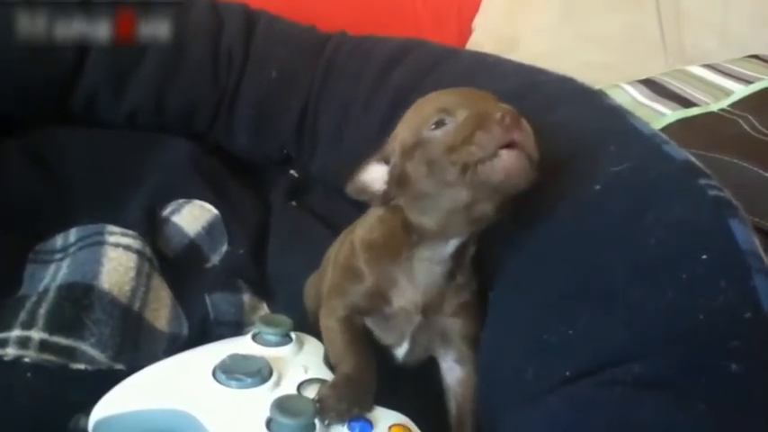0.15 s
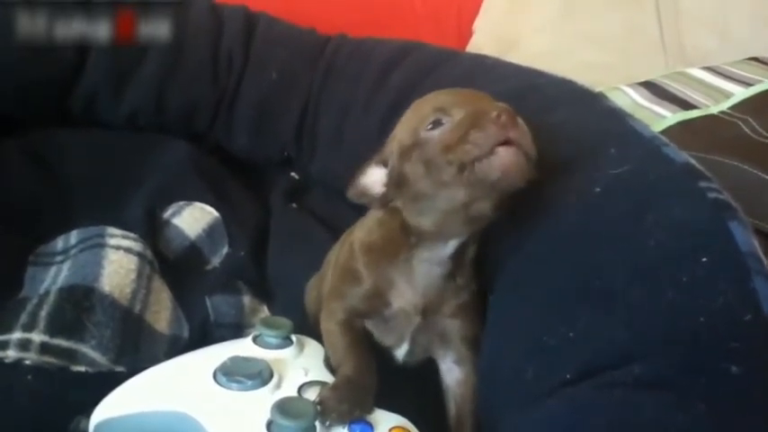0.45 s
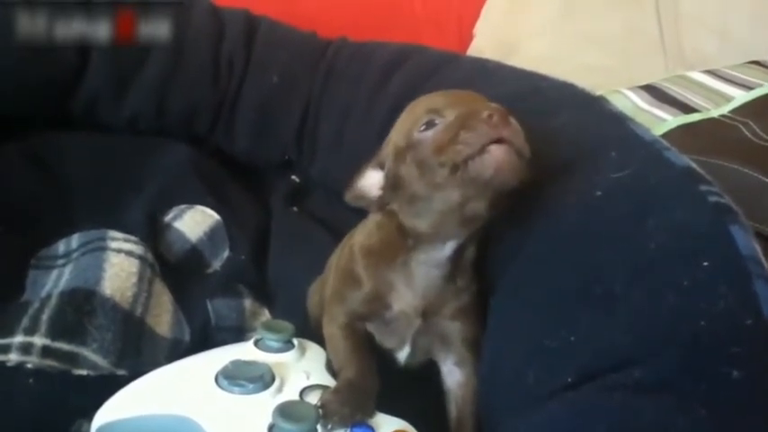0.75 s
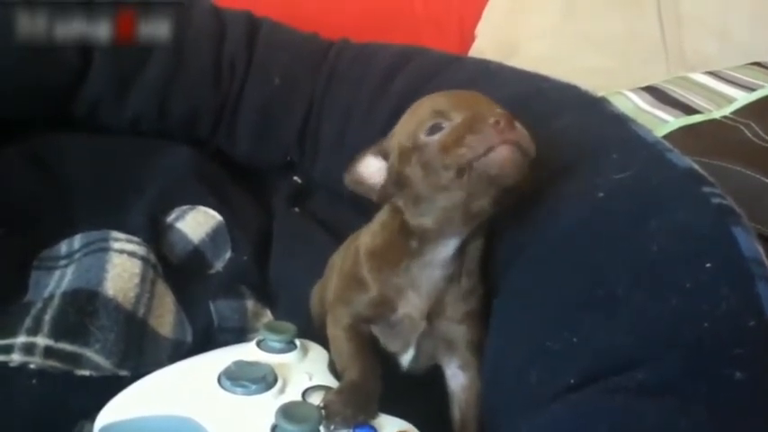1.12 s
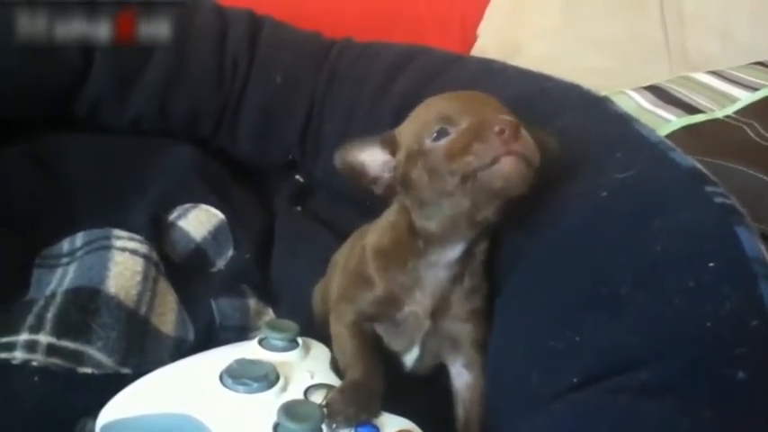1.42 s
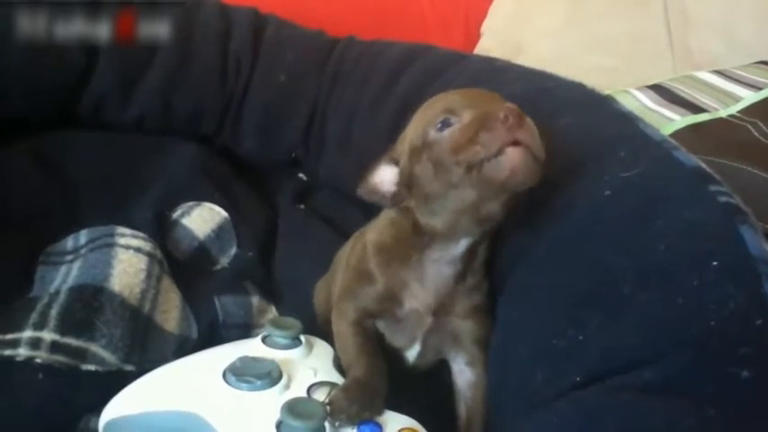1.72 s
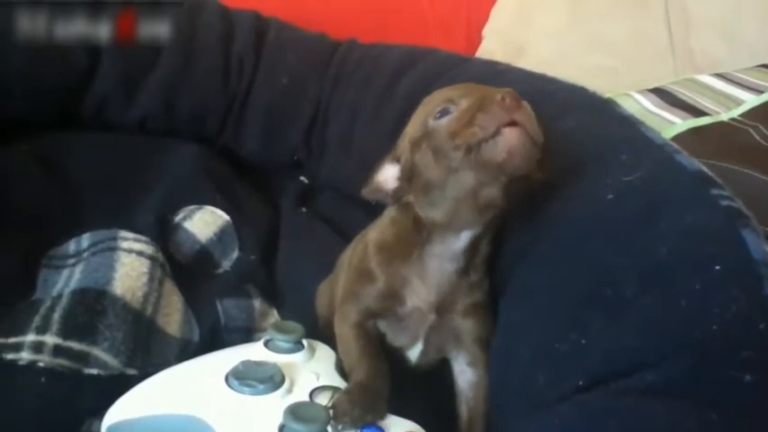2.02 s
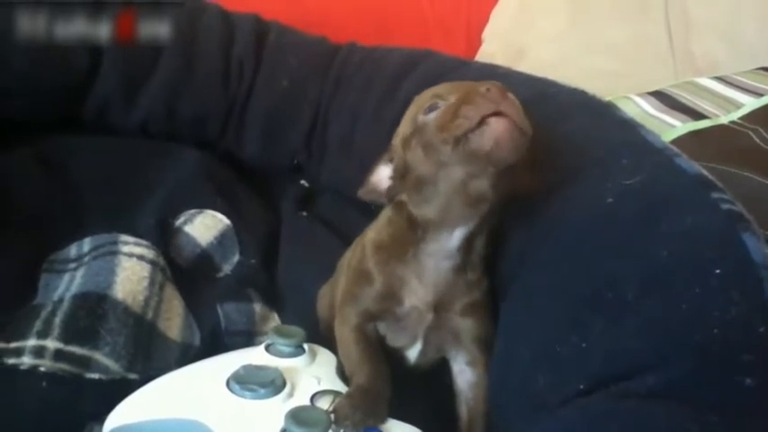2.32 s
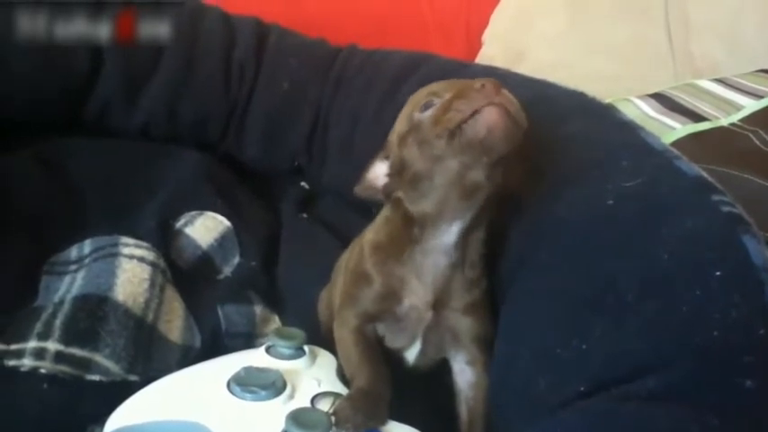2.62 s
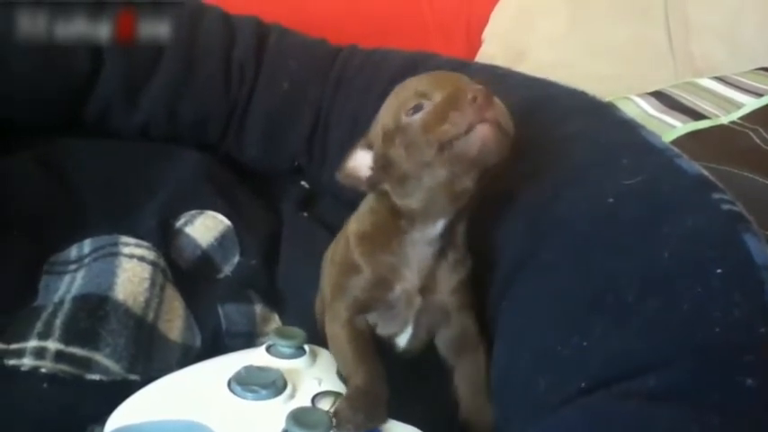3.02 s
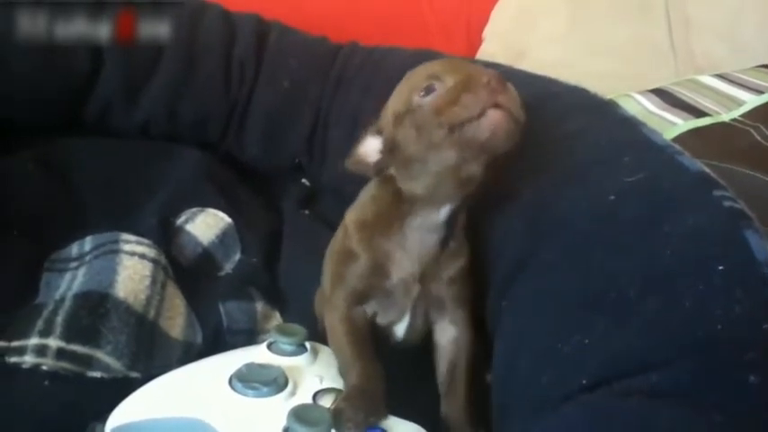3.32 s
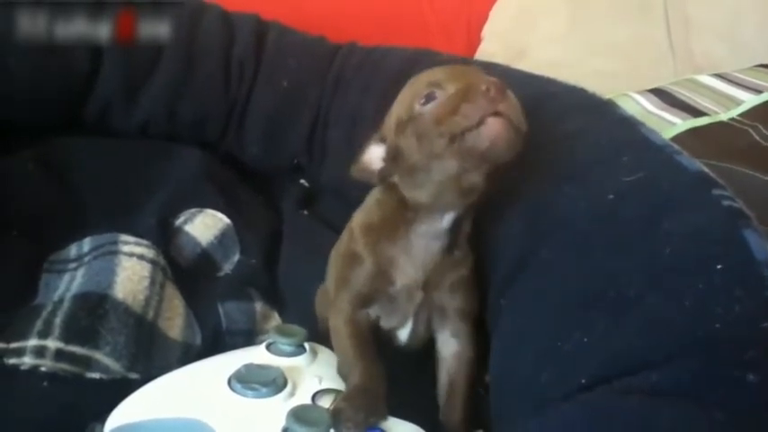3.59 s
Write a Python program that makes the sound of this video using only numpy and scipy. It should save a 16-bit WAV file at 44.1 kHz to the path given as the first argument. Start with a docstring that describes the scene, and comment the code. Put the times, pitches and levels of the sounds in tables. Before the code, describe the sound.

A young puppy howls three times, close to the microphone in a quiet, soft room; each howl slides up fast, and the last, after a soft breath, is cut off. Faint hum and hiss lie beneath.

```python
"""A clean, high puppy howl slides up at once, close by in a quiet, soft room; two more follow.
Each howl stacks partials on one gliding pitch, with pulsed air leaking through.
Short creaks roughen the starts of the howls and the ends of the first two: uneven pulses ring a throat.
Under them lie a wavering mains hum and a coloured noise floor of room hum and microphone hiss.
Shaped noise makes a soft breath before the last howl and a low rustle that swells near the end."""
import sys
import numpy as np
from scipy import signal
from scipy.fft import rfft, irfft
from scipy.io import wavfile
from scipy.ndimage import uniform_filter1d

SR = 44100
rng = np.random.default_rng(int(sys.argv[2]) if len(sys.argv) > 2 else 0)


def wav_record(signal):
    """Record a signal, one row per channel, as 16-bit PCM in the file named by sys.argv[1]."""
    frames = np.transpose(np.atleast_2d(signal))
    bounded = np.clip(frames, -1, 1)
    # unit amplitude maps onto the largest positive 16-bit level
    quanta = np.round(bounded * 32767).astype(np.int16)
    wavfile.write(sys.argv[1], SR, quanta)


N = 165375

# Noise floor of room and microphone, relative colour: f/Hz, density/dB per Hz
FLOOR_COLOUR = [(25, -25.5), (125, -0.5), (214, -5.5), (258, -2.5), (441, -12), (478, -6), (561, -12),
                (1160, -13), (1730, -15), (2390, -20), (3480, -22), (15200, -28)]
FLOOR_DB = -44.5
HUM_HZ, HUM_DB = 124.3, -56

# Low rustle that swells near the end: t/s, level/dB
RUSTLE_LEVEL = [(3.45, -50), (3.512, -65), (3.75, -37.5)]
# Colour of the rustle: f/Hz, relative level/dB
RUSTLE_COLOUR = [(40, -42), (120, -16), (250, -22), (450, -44), (900, -48)]

# Breath drawn before the last howl: t/s, level/dB
INHALE_LEVEL = [(2.98, -62), (3.004, -43), (3.25, -52), (3.27, -55)]
# Colour of that breath: f/Hz, relative level/dB
INHALE_COLOUR = [(300, -2), (1000, 2), (2000, -2), (3000, -8.5), (6000, -17), (9000, -32)]

ROOM_DB, ROOM_T60_S, ROOM_TOP_HZ = -26.5, 0.35, 1250

# Moments where the folds lose their beat:
# start t/s, length/s, level/dB, mean pulse rate/Hz, unevenness/0-1, level change over the creak/dB
CREAKS = [(0.006, 0.076, -30, 360, .3, -4), (0.957, 0.062, -25, 430, .3, -16),
          (1.744, 0.034, -27.5, 420, .3, 8), (2.625, 0.03, -30, 430, .3, -14),
          (3.2895, 0.03, -25.5, 265, .1, -2)]
CREAK_RISE_S, CREAK_FADE = 0.0022, 0.36  # the last share of each creak dies away
# Throat resonances rung by each creak pulse: f/Hz, width/Hz, relative level/dB
THROAT_RINGS = [(520, 300, -5), (822, 100, 13), (1220, 400, 1), (1890, 570, -11), (2234, 180, -10)]

# Pitch and partials through each of the three howls:
# t/s, pitch f/Hz, first partial level/dB, second level/dB, third level/dB, fourth level/dB
HOWLS = [
    [(0.0, 529.5, -20, -26.5, -40, -36.5), (0.036, 651, -20.5, -19, -26, -44),
     (0.056, 798, -18.5, -24, -36.5, -53), (0.076, 835, -15.5, -20.5, -32.5, -34),
     (0.096, 890, -12, -18, -40, -37), (0.14, 987, -14.5, -19, -36.5, -53),
     (0.17, 1011, -8.5, -19.5, -35, -42), (0.192, 1026, -14.5, -19.5, -36, -39.5),
     (0.322, 1061, -10, -17.5, -38, -39.5), (0.388, 1051, -13, -18, -40.5, -38.5),
     (0.496, 1015, -13, -18.5, -37, -43.5), (0.568, 1002, -8, -17, -41.5, -48),
     (0.576, 995, -11, -18, -38.5, -52), (0.642, 945, -17.5, -19.5, -42, -29.5),
     (0.72, 916.5, -12, -18.5, -39, -34), (0.778, 881.7, -14.5, -18, -38.5, -44),
     (0.86, 868.3, -14.5, -18, -37.5, -40), (0.955, 740, -23, -19, -32.5, -46),
     (0.961, 743, -39, -31, -47, -57)],
    [(1.639, 291, -32, -40.5, -52.5, -52), (1.664, 361.6, -24.5, -39, -32, -45),
     (1.688, 426.6, -21.5, -28.5, -30.5, -41.5), (1.73, 494.3, -20.5, -26.5, -43, -35),
     (1.75, 615, -24, -18.5, -24.5, -37), (1.758, 714, -19, -23, -32, -56),
     (1.766, 829, -20, -20.5, -40.5, -41), (1.78, 903, -10, -20, -37, -51),
     (1.796, 907, -15, -22, -41, -55), (1.826, 969, -11, -20.5, -36, -44),
     (1.89, 1071, -9.5, -19, -31.5, -34.5), (1.924, 1098, -7.5, -19.5, -32, -43),
     (2.07, 1082, -8.5, -19, -33.5, -46.5), (2.136, 1074, -9, -17.5, -34, -39.5),
     (2.274, 1032, -15, -18, -37, -39), (2.438, 994, -11, -18, -41, -43),
     (2.458, 962, -18.5, -19.5, -41.5, -43.5), (2.504, 914, -14.5, -18, -41, -31.5),
     (2.546, 845, -18.5, -17.5, -40, -43), (2.59, 726, -26.5, -17.5, -31, -42.5),
     (2.62, 683, -31, -25, -39, -50), (2.63, 686, -45, -34, -48, -57)],
    [(3.29, 738, -27.5, -45, -42, -52), (3.311, 846, -17.5, -26.5, -43, -59),
     (3.321, 882, -13.5, -21, -41, -63), (3.341, 998, -11.5, -25, -35, -40),
     (3.359, 1075, -11.5, -25.5, -32, -35.5), (3.385, 962, -11, -24, -38, -42),
     (3.399, 932, -16, -19, -32.5, -45), (3.439, 973.5, -11, -21, -37.5, -41),
     (3.469, 1009, -9.5, -20.5, -32, -36.5), (3.511, 1003, -8, -19, -35.5, -37),
     (3.563, 1028, -13, -19, -40, -39), (3.595, 1038, -11.5, -21, -33.5, -36.5),
     (3.647, 1060, -13, -20, -40, -35), (3.741, 1015, -12.5, -20, -38, -40),
     (3.75, 996, -10.5, -21, -60, -38)],
]
# Treble level through each howl, before throat colour and glide: t/s, level/dB
HOWL_TREBLE = [
    [(0.0, -69), (0.004, -51), (0.312, -37), (0.66, -44.5), (0.872, -41.5), (0.958, -49)],
    [(1.7, -58), (1.826, -39.5), (1.99, -38.5), (2.568, -45.5), (2.63, -55)],
    [(3.295, -52), (3.36, -42), (3.685, -40), (3.75, -44)],
]
# Throat and mouth colour of the air and the partials above the fourth: f/Hz, relative level/dB
TRACT_COLOUR = [(900, -6.5), (1500, 0.5), (2200, -2), (2700, -13.5), (3500, -5), (4150, -5), (4600, -11.5),
                (5200, -16), (6000, -29), (7200, -12), (8300, -6), (9600, -9.5), (10700, -15.5),
                (12300, -15), (13500, -27), (14300, -52.5)]
# Uneven beats, one strong cycle per group: start t/s, length/s, cycles per group, depth/0-1
WOBBLES = [(.008, .036, 2, .3), (.052, .026, 3, .4), (1.758, .02, 2, .5), (2.606, .018, 2, .25),
           (3.284, .044, 3, .65)]

EDGE_S, FAST_GLIDE_HZ_PER_S = 0.00058, 1800
JITTER, GLIDE_JITTER = 0.0019, 0.006  # share of the pitch: always, and added in fast glides
FLUTTER_DB, WAVER_DB, SHIMMER_DB = 0.7, 0.45, 3  # waver is per partial number
CHEST_DB_PER_PARTIAL, CHEST_TOP_HZ = -5, 3200  # partials above the fourth that follow its level
BREATHY_DB, TREBLE_AIR_DB, GLIDE_AIR_DB = -38, -18, 13
TREBLE_HZ = 6500  # treble air is cut by 40 dB below this
BAND_TOP_HZ = 15330


def gain_of(db):
    """Turn decibels into an amplitude factor."""
    return 10 ** (np.asarray(db) / 20)


def evened(x):
    """Scale a signal to rms 1."""
    return x / np.sqrt(np.mean(x ** 2) + 1e-20)


def read(points, hz):
    """Read a colour curve on a logarithmic frequency scale."""
    f, value = np.transpose(points)
    return np.interp(np.log(hz + 1), np.log(f + 1), value)


def add(mix, start_s, sound):
    """Lay a sound into the mix, cut off at the end of the scene."""
    part = mix[max(round(start_s * SR), 0):][:len(sound)]
    part += sound[:len(part)]


def coloured(points, size):
    """Noise of rms 1, its spectrum shaped by a colour curve."""
    spectrum = rfft(rng.standard_normal(size))
    hz = np.fft.rfftfreq(size, 1 / SR)
    return evened(irfft(spectrum * gain_of(read(points, hz)), size))


def drift(size, span_s):
    """Random wandering of rms 1: white noise averaged twice over a span."""
    span = max(round(span_s * SR), 2)
    once = uniform_filter1d(rng.standard_normal(size), span)
    return evened(uniform_filter1d(once, span))


def noise_floor():
    """Low room hum and microphone hiss as one steady coloured noise."""
    return gain_of(FLOOR_DB) * coloured(FLOOR_COLOUR, N)


def hum():
    """Mains hum: one sine whose level wavers a little."""
    level = gain_of(HUM_DB + 1.5 * drift(N, 0.05))
    return level * np.sqrt(2) * np.sin(2 * np.pi * HUM_HZ * np.arange(N) / SR)


def swell(level_rows, colour):
    """Coloured noise under a level curve, with a short fade-in."""
    s, db = np.transpose(level_rows)
    t = np.arange(s[0], s[-1], 1 / SR)
    fade_in = np.minimum((t - s[0]) / 0.022, 1)
    return s[0], gain_of(np.interp(t, s, db)) * fade_in * coloured(colour, len(t))


def rustle():
    """A low rustle: dark noise that swells near the end."""
    return swell(RUSTLE_LEVEL, RUSTLE_COLOUR)


def inhale():
    """A soft breath: turbulent air as noise with a mid-range colour."""
    return swell(INHALE_LEVEL, INHALE_COLOUR)


def room(x):
    """A faint, dull tail from the walls: decaying low-passed noise as the echo pattern."""
    t = np.arange(SR // 2) / SR
    tail = rng.standard_normal(len(t)) * gain_of(-60 * t / ROOM_T60_S) * (t > 0.008)
    tail = signal.sosfilt(signal.butter(2, ROOM_TOP_HZ, fs=SR, output="sos"), tail)
    return gain_of(ROOM_DB) * signal.fftconvolve(x, tail / np.linalg.norm(tail))[:N]


def throat_ring():
    """The throat's answer to one slap: damped resonances of alternating sign, band-passed."""
    u = np.arange(1500) / SR
    ring = np.zeros(len(u))
    for k, (hz, width, db) in enumerate(THROAT_RINGS):
        swell_and_decay = width ** 2 * u * np.exp(-2 * np.pi * width * u)
        ring += (-1) ** k * gain_of(db) * swell_and_decay * np.sin(2 * np.pi * hz * u)
    band = signal.butter(3, [290, 2600], "bandpass", fs=SR, output="sos")
    return signal.sosfilt(band, ring)


def creak(start, length, level_db, rate, uneven, change_db):
    """Uneven soft slaps of the folds, each ringing the throat."""
    t = np.arange(0, length, 1 / SR)
    turns = np.cumsum(rate * np.exp(uneven * drift(len(t), 0.003))) / SR
    # one slap each time the count passes a whole turn, each with a random strength
    slaps = np.diff(np.floor(turns + 0.97), prepend=0)
    slaps = slaps * gain_of(3.1 * uneven * rng.standard_normal(len(t)))
    rise = np.minimum(0.68 + t / CREAK_RISE_S, 1)
    fade = np.clip((1 - t / length) / CREAK_FADE, 0, 1)
    slaps = slaps * rise * gain_of(change_db * t / length) * fade
    sound = np.convolve(slaps, throat_ring())
    return start, gain_of(level_db) * sound / np.sqrt(np.mean(sound[:len(t)] ** 2))


def folds_tone(t, hz, partials_db, treble, glide, turn):
    """The folds' partials: the lowest four follow their own level curves, throat and mouth colour the rest."""
    tone = np.zeros(len(t))
    for k, db in enumerate(partials_db, 1):
        flutter = FLUTTER_DB * drift(len(t), 0.027)
        waver = k * WAVER_DB * drift(len(t), 0.0054)
        tone += gain_of(db + flutter + waver) * np.cos(k * turn + 1.23 * (k - 1))
    for k in range(5, 24):
        shimmer = SHIMMER_DB * drift(len(t), 0.026)
        bright = gain_of(treble + read(TRACT_COLOUR, k * hz) - 3 * glide + shimmer)
        # a low voice carries more of these
        chest = gain_of(partials_db[3] + CHEST_DB_PER_PARTIAL * (k - 3.5))
        chest = chest / (1 + (k * hz / CHEST_TOP_HZ) ** 10)
        tone += (k * hz < BAND_TOP_HZ) * (bright + chest) * np.cos(k * turn - 0.95 * k)
    for start, length, group, depth in WOBBLES:
        span = np.sin(np.pi * np.clip((t - start) / length, 0, 1)) ** 0.5
        tone *= 1 + depth * span * np.cos(turn / group + drift(len(t), 0.0029) / 2)
    return np.sqrt(2) * tone


def leaking_air(first, treble, glide, turn):
    """Air through the folds, pulsed once per cycle; its treble grows where the pitch slides fast."""
    air = gain_of(BREATHY_DB + first) * coloured(TRACT_COLOUR, len(first))
    top = [(f, db - 40 * (f < TREBLE_HZ)) for f, db in TRACT_COLOUR]
    air += gain_of(TREBLE_AIR_DB + GLIDE_AIR_DB * glide + treble) * coloured(top, len(first))
    return (1 + 0.5 * np.cos(turn)) * air


def howl(rows, treble_rows):
    """One howl: gliding partials and leaking air share one jittered pitch."""
    s, *columns = np.transpose(rows)
    t = np.arange(s[0], s[-1], 1 / SR)
    curves = [uniform_filter1d(np.interp(t, s, c), 300, mode="nearest") for c in columns]
    hz, *partials_db = curves
    treble = np.interp(t, *np.transpose(treble_rows))
    # 0 on a held pitch, towards 1 in a fast slide
    slide = uniform_filter1d(abs(np.gradient(hz)), 900) * SR
    glide = np.tanh(slide / FAST_GLIDE_HZ_PER_S)
    jitter = (JITTER + GLIDE_JITTER * glide ** 2) * drift(len(t), 0.0048)
    turn = 2 * np.pi * np.cumsum(hz * (1 + jitter)) / SR
    voice = folds_tone(t, hz, partials_db, treble, glide, turn)
    voice = voice + leaking_air(partials_db[0], treble, glide, turn)
    # short fades, skipped where the howl meets the start or end of the scene
    fade_in = (t - s[0] + (s[0] < EDGE_S)) / EDGE_S
    fade_out = (s[-1] - t + (s[-1] > N / SR - EDGE_S)) / EDGE_S
    return s[0], np.clip(np.minimum(fade_in, fade_out), 0, 1) * voice


def scene():
    """Mix the background, then the puppy's voice with its room tail."""
    background = noise_floor() + hum()
    add(background, *rustle())
    add(background, *inhale())
    pup = np.zeros(N)
    for row in CREAKS:
        add(pup, *creak(*row))
    for rows, treble_rows in zip(HOWLS, HOWL_TREBLE):
        add(pup, *howl(rows, treble_rows))
    return (background + pup + room(pup))[None]


def record(dry):
    """A steep linear-phase low-pass closes the top of the band."""
    low_pass = signal.firwin(1023, BAND_TOP_HZ, window=("kaiser", 9), fs=SR)
    return signal.oaconvolve(dry, low_pass[None], "same")


dry = scene()
out = record(dry)
wav_record(out)
```